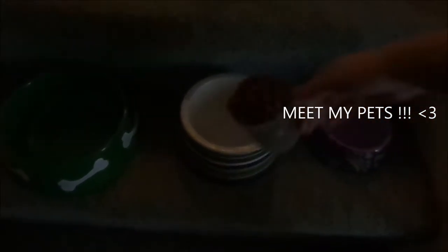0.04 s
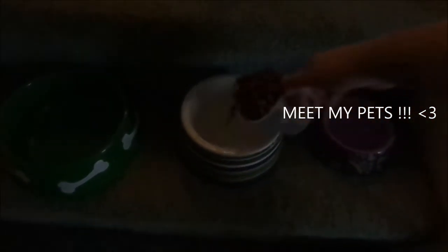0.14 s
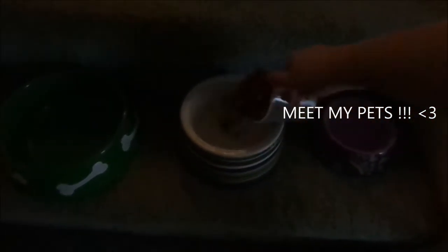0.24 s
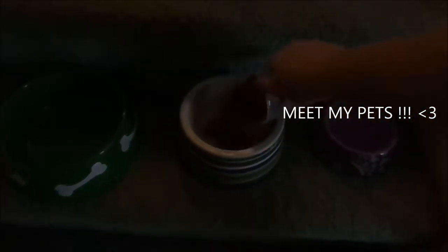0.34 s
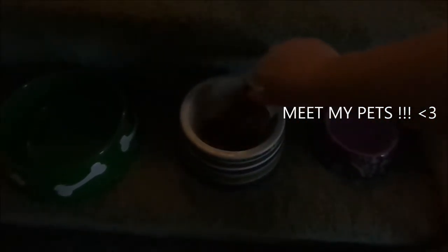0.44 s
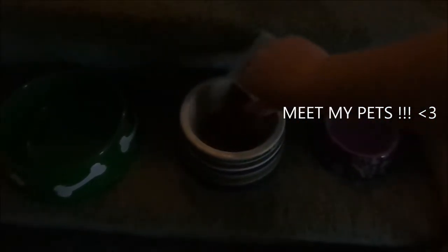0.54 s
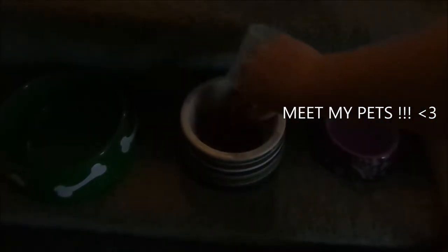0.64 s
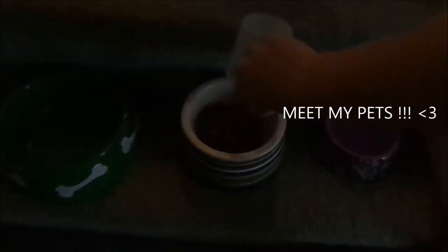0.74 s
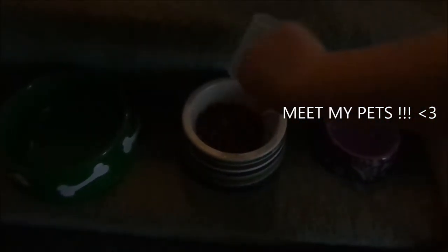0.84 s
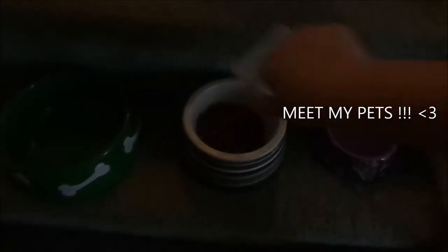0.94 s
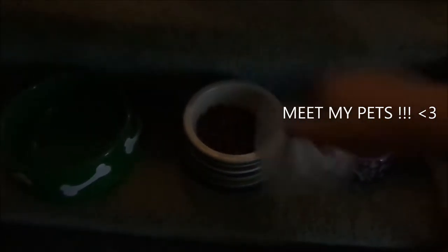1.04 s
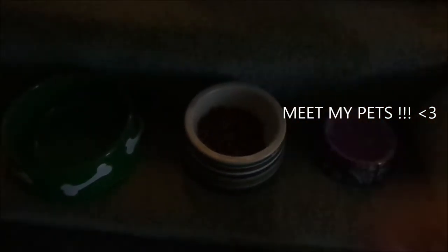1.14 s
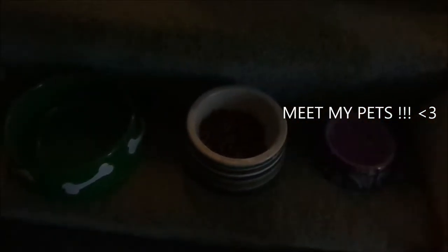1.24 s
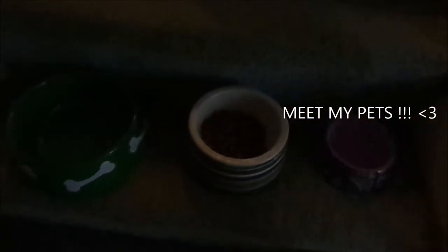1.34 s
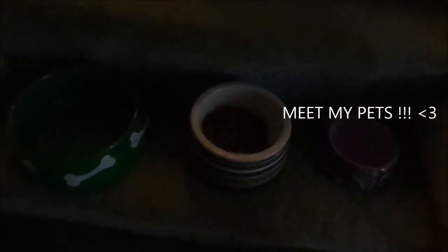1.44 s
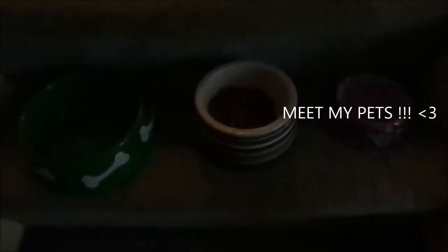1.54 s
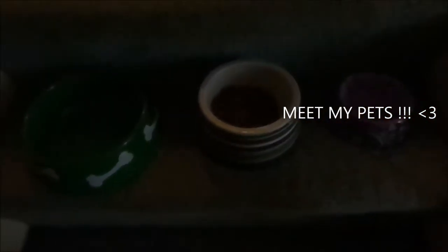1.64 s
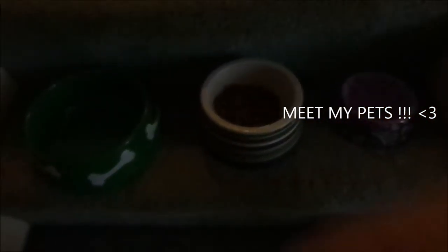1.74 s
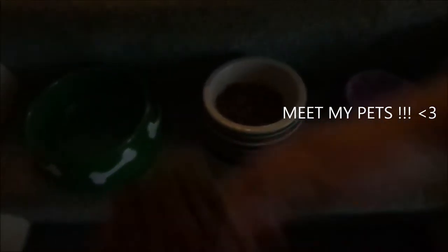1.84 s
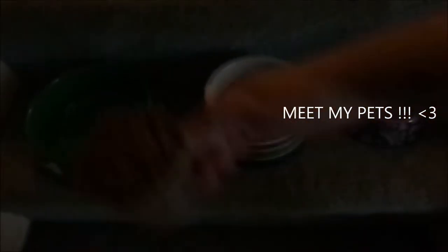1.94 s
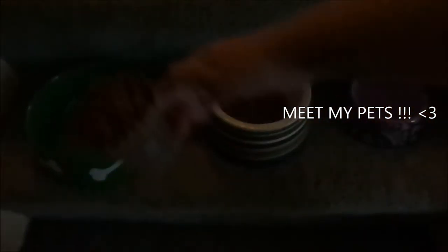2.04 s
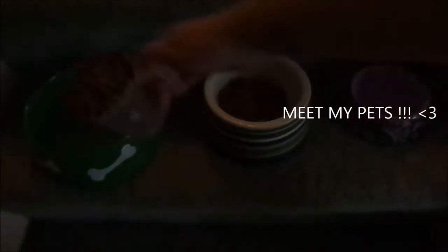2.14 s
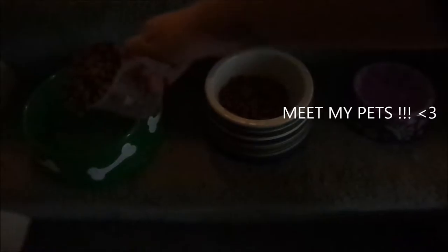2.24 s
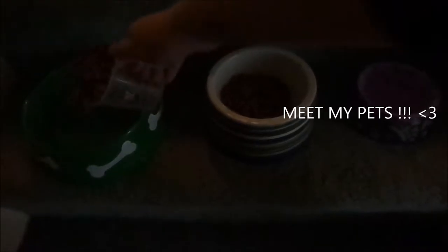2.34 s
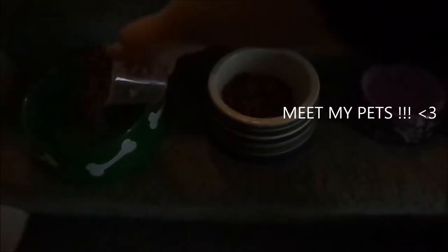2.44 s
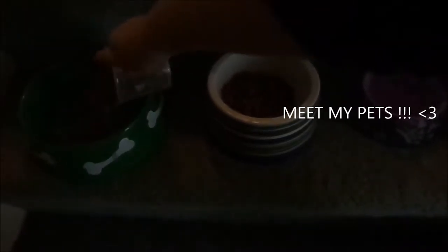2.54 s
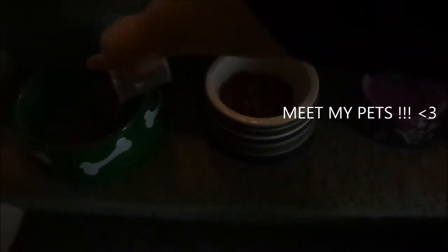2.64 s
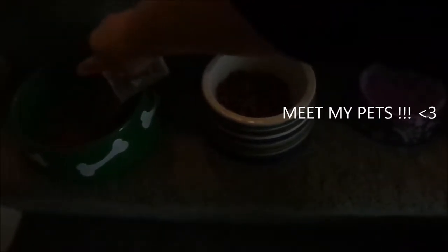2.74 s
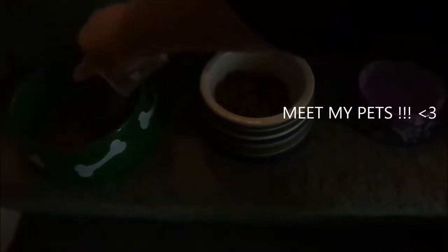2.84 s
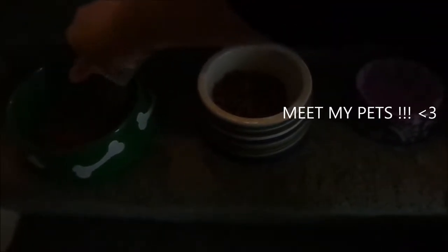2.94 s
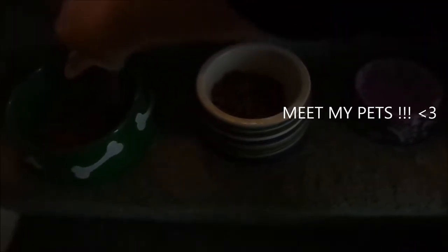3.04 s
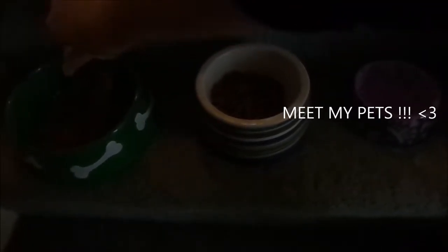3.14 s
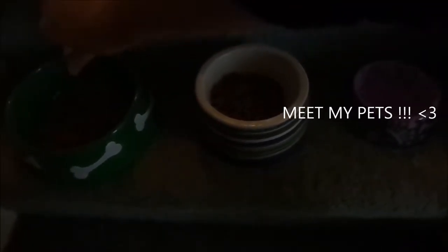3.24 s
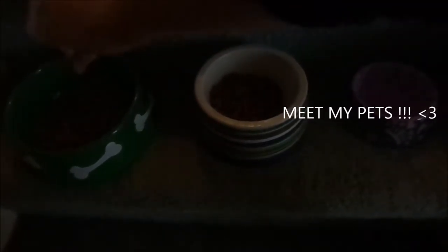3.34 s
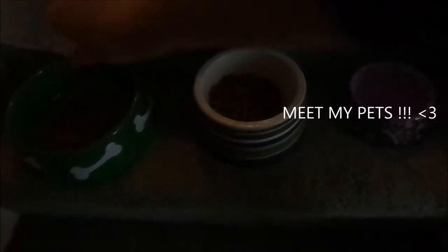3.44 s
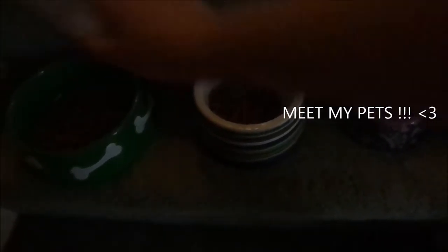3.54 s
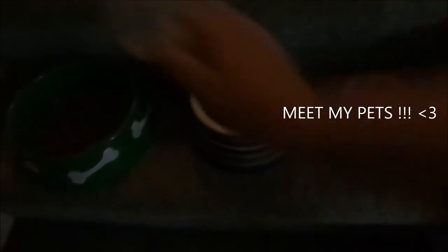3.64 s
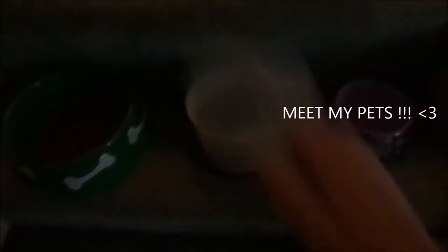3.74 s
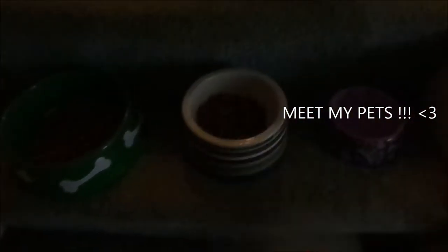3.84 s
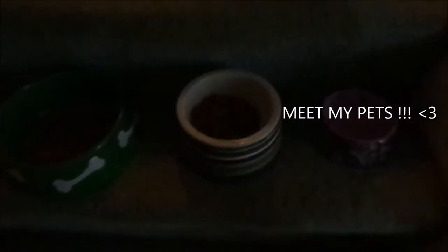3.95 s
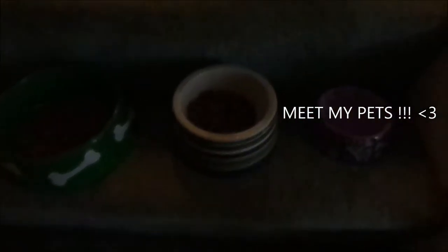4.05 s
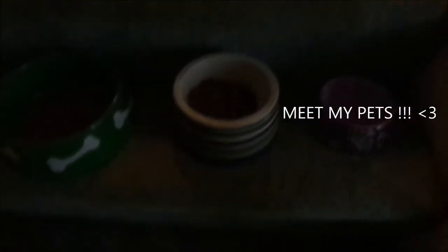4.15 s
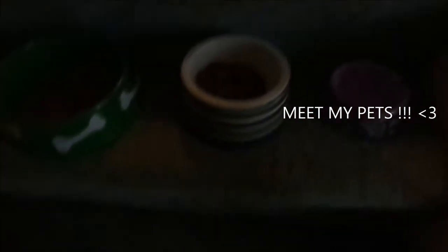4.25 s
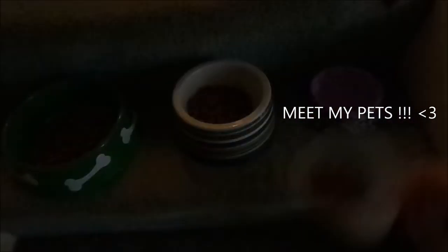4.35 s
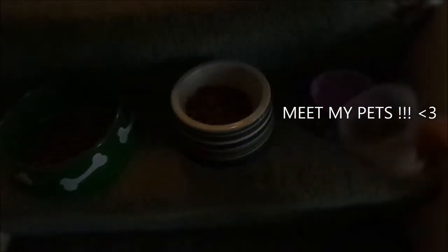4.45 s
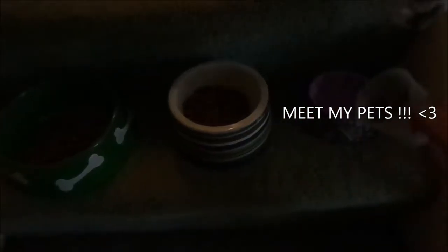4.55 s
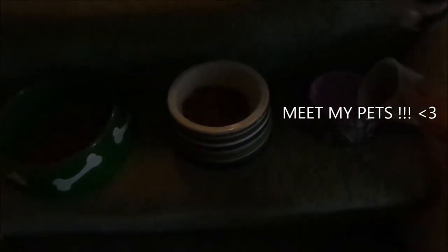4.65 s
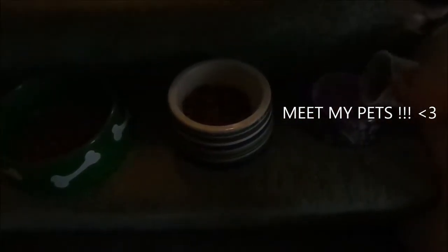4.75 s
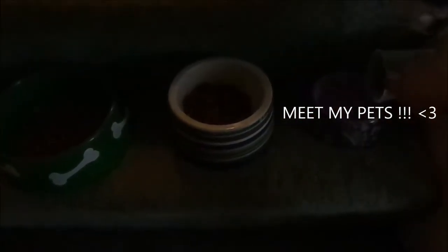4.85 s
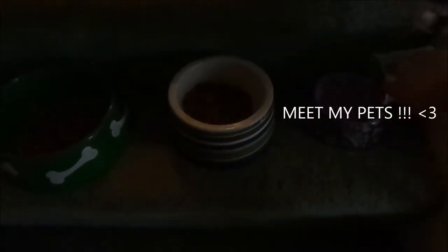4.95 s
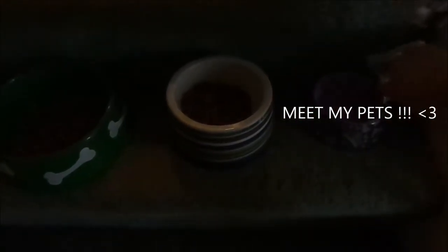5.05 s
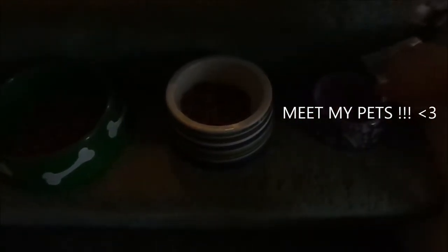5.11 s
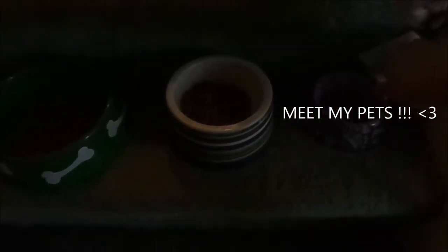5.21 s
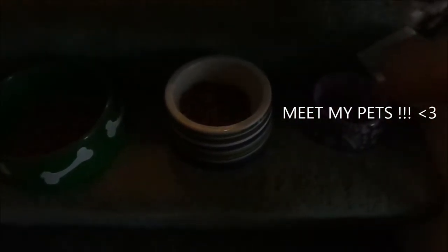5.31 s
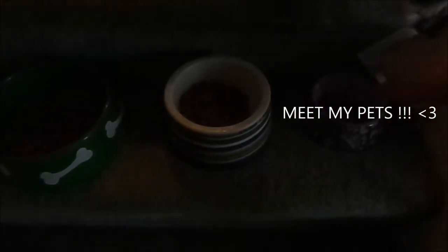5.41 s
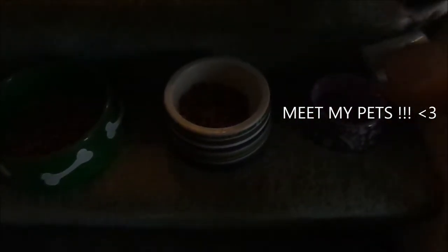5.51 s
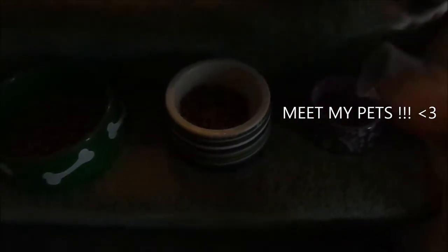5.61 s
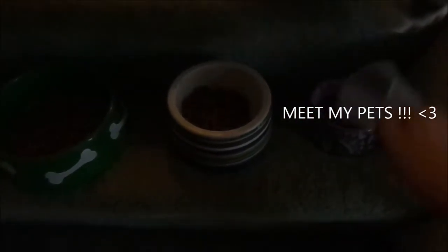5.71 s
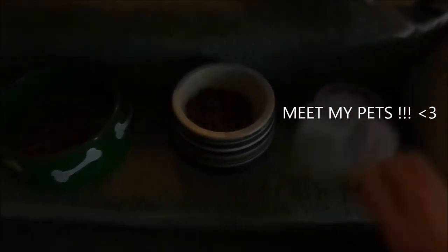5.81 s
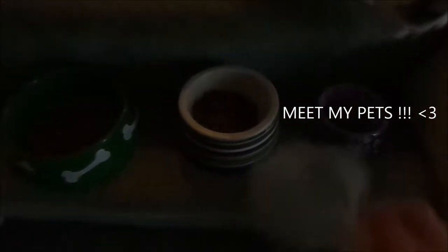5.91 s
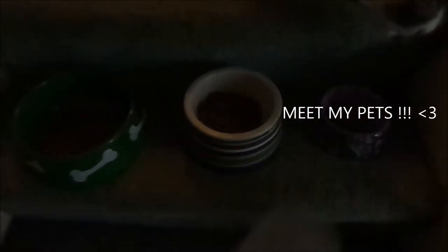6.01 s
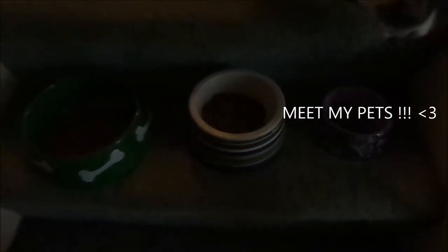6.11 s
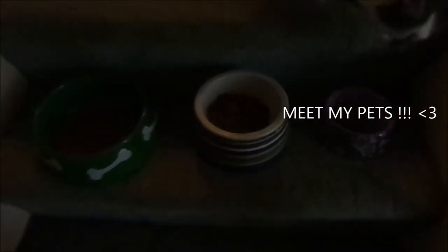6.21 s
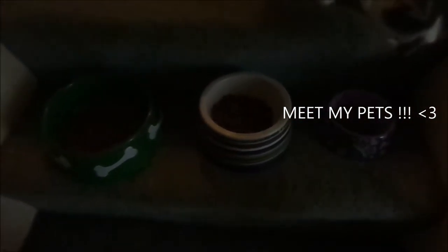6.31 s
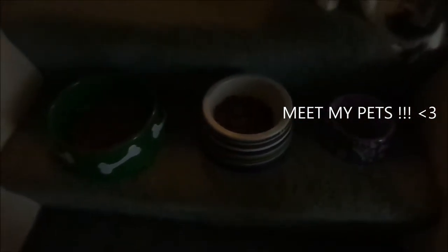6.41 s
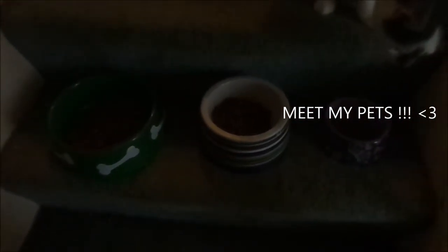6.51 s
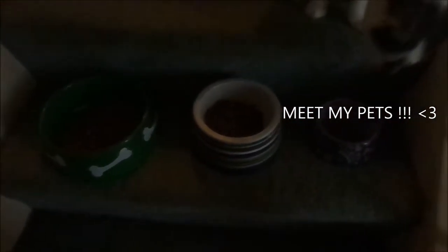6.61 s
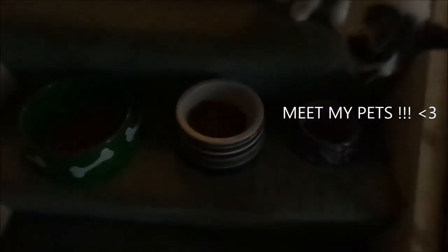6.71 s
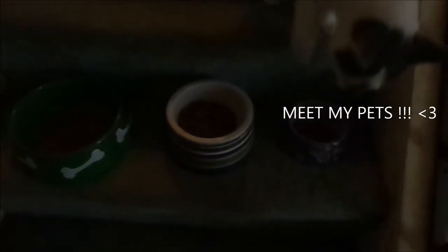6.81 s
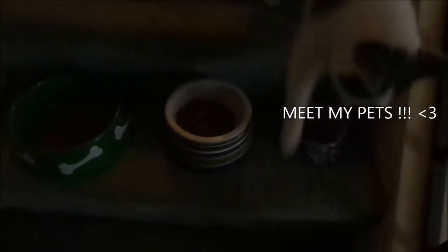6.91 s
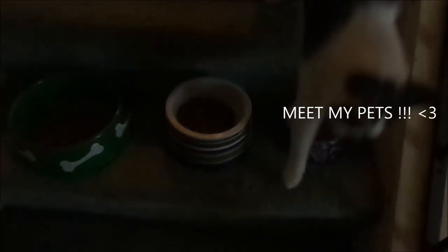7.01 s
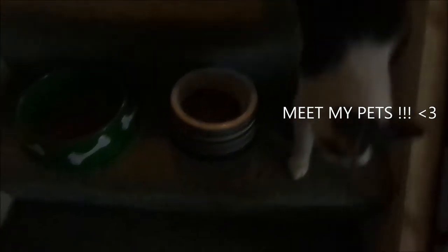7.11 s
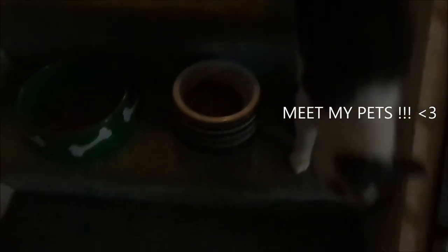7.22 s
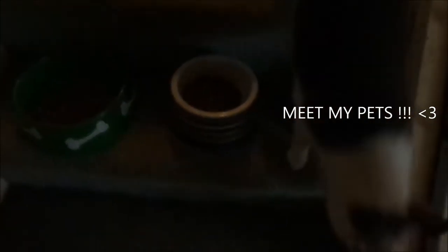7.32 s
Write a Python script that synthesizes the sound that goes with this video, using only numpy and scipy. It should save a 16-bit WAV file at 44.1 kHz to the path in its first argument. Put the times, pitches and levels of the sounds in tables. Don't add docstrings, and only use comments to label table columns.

```python
import sys
import numpy as np
from scipy import signal
from scipy.fft import rfft, irfft
from scipy.io import wavfile
from scipy.ndimage import uniform_filter1d

SR = 44100
rng = np.random.default_rng(int(sys.argv[2]) if len(sys.argv) > 2 else 0)


def master_out(mix):
    frames = np.transpose(np.atleast_2d(mix))
    ceiling = np.clip(frames, -1, 1)
    pcm = np.round(ceiling * 32767).astype(np.int16)
    wavfile.write(sys.argv[1], SR, pcm)


def decibels_to_gain(level_db):
    exponent = np.asarray(level_db, float) / 20
    return 10 ** exponent


N = 325017
t = np.arange(N) / SR


def unit(x):
    return x / np.sqrt(np.mean(x ** 2))


def noise():
    return rng.standard_normal(N)


def wander(*sizes):
    drift = noise()
    for size in sizes:
        drift = uniform_filter1d(drift, size=size)
    return unit(drift)


def filtered(x, order, hz, kind):
    return signal.sosfilt(signal.butter(order, hz, kind, fs=SR, output="sos"), x)


def through(x, taps):
    return signal.oaconvolve(x, taps / np.linalg.norm(taps))[:N]


def colour(x, points):
    hz, db = np.transpose(points)
    grid = np.linspace(1, SR / 2, 1025)
    level_db = np.interp(np.log(grid), np.log(hz), db)
    cepstrum = irfft(np.log(decibels_to_gain(level_db)))
    cepstrum[1:1024] *= 2
    cepstrum[1025:] = 0
    return through(x, irfft(np.exp(rfft(cepstrum))))


def ring(x, modes):
    taps, lag = 0, np.arange(SR // 4) / SR
    for hz, width, db in modes:
        decay = width * np.exp(-np.pi * width * lag)
        taps = taps + decibels_to_gain(db) * decay * np.sin(2 * np.pi * hz * lag)
    return through(x, taps)


def bursts(times, gains, ms):
    kick = np.zeros(N)
    at = np.minimum((np.asarray(times) * SR).astype(int), N - 1)
    np.add.at(kick, at, gains)
    return signal.lfilter([1], [1, -np.exp(-1000 / ms / SR)], kick)


def swell(s, db, rise_ms, t60):
    age = np.maximum(t - s, 0)
    rise = 1 - np.exp(-1000 * age / max(rise_ms, .2))
    return rise * decibels_to_gain(db - 60 * age / max(t60, .02))


def tent(peak_s, db, rise_db_s, fall_db_s):
    return decibels_to_gain(db - np.maximum(rise_db_s * (peak_s - t), fall_db_s * (t - peak_s)))


def room(x, t60):
    lag = np.arange(SR // 2) / SR
    hiss = rng.standard_normal(len(lag))
    dull = uniform_filter1d(hiss, size=6)
    tail = dull * decibels_to_gain(-60 * lag / t60) + (hiss - dull) * decibels_to_gain(-60 * lag / (0.66 * t60))
    tail *= np.clip(lag / 0.0028, 0, 1)
    return through(x, tail)


# start_s, level_db
FLOWS = [
    [(0.335, -38), (0.345, -20), (0.40, -19), (0.465, -9.5), (0.481, -17.5), (0.68, -34)],
    [(0.6, -32.5), (0.7, -32.5), (0.715, -29), (0.82, -30), (0.966, -45.5), (1.12, -66)],
    [(2.455, -48), (2.47, -26), (2.585, -16.5), (2.64, -21), (2.72, -16.5), (3.04, -27), (3.33, -35),
     (3.56, -80)],
    [(5.075, -42), (5.09, -23), (5.14, -18.5), (5.24, -19), (5.295, -26), (5.32, -37), (5.4, -58)],
]
# start_s, peak_db
MIDDLE_PELLETS = [(0.3053, -0.5), (0.3261, -6), (0.3416, -1.5), (0.3426, -3.5), (0.358, -13), (0.372, 0.5),
                  (0.399, -13), (0.418, -0.5), (0.4334, -7), (0.4477, -6), (0.4575, -4), (0.4635, -12.5),
                  (0.489, -11.5), (0.5078, -10.5), (0.5211, -5), (0.572, -13), (0.5787, -28)]
CUP_PELLETS = [(0.619, -38), (0.63, -41), (0.638, -22), (0.657, -30), (0.6658, -38.5), (0.713, -10),
               (0.7216, -23), (0.7365, -6.5), (0.7615, -5), (0.7924, -26), (0.8154, -9.5), (0.829, -13),
               (0.8467, -8), (0.8856, -22)]
WIDE_PELLETS = [(2.413, 0.5), (2.442, -1.5), (2.462, 1.5), (2.474, -0.5), (2.498, 0), (2.51, -4),
                (2.522, 0), (2.54, -1.5), (2.558, 5), (2.566, -2), (2.591, -0.5), (2.608, -1), (2.706, 3),
                (2.78, -16), (2.794, -7), (2.804, -24), (2.858, -7.5), (2.876, -6.5), (2.894, -28),
                (2.942, -32), (2.959, -22), (2.983, -12), (3.248, -26), (3.261, -26), (3.378, -22.5),
                (3.393, -23), (3.404, -21.5), (3.489, -33.5)]
DISH_PELLETS = [(4.9594, -34), (5.0116, -2.5), (5.0462, -9.5), (5.0553, -9), (5.0848, -5), (5.0959, -7.5),
                (5.109, -14.5), (5.1176, -13), (5.137, -7), (5.1576, -4), (5.2391, -9.5), (5.2659, -19),
                (5.3133, -13), (5.339, -12), (5.397, -47)]
# pitch_hz, level_db (per Hz)
MIDDLE_CRACK = [(300, -45), (1000, -28), (2000, -24), (3300, -13), (4500, -4), (6000, -2), (9000, -5),
                (14500, -12)]
CUP_PELLET_CRACK = [(300, -14.5), (700, -7), (1900, -4), (3300, -3.5), (7000, -2), (10000, -3),
                    (14500, -10.5)]
WIDE_CRACK = [(150, -20.5), (400, -9.5), (1000, -6), (1600, -3.5), (3500, -6), (6000, -14.5), (14500, -21)]
DISH_CRACK = [(300, -45), (900, -25), (1700, -23), (2900, -10), (4500, -4), (6000, -5), (9000, -9),
              (14500, -16)]
# pitch_hz, width_hz, level_db
MIDDLE_MODES = [(1265, 40, -7), (1330, 60, -11), (2460, 50, -1), (2540, 70, -8), (3750, 80, 3),
                (3930, 80, 4), (4080, 90, 1), (4230, 70, -7), (5990, 150, -8), (6450, 120, -9),
                (7230, 130, -11), (8070, 100, -13), (9020, 140, -12)]
CUP_PELLET_MODES = [(3300, 240, -6), (5260, 250, -9.5), (6200, 280, -10), (7100, 680, -1.5),
                    (7900, 240, -3.5), (12300, 270, -9.5)]
WIDE_MODES = [(524, 24, -2), (794, 51, -0.5), (1590, 88, 0.5), (1760, 92, -5), (2240, 140, -4.5),
              (3020, 340, -18)]
DISH_MODES = [(1020, 70, -10), (1310, 120, -8), (2230, 100, 3), (2450, 80, -1), (3390, 120, 0),
              (3560, 110, -3), (4140, 100, -6), (4780, 110, -7), (5280, 150, -5), (6610, 120, -9),
              (7430, 130, -11), (9010, 150, -9), (11300, 160, -14), (13400, 160, -17)]
# pellets_per_s, size_scatter_db, stream_db, modes_db, crack_ms,
# lowest_hz (that the wall radiates), heap_damping_db_s
POUR_SETTINGS = [
    (1100, 4, -5, 1, 1.2, 1050, 22),
    (1600, 3.5, -2, -4, 1.1, 2000, 5),
    (2300, 3.2, -3, -3, 1.5, 380, 3),
    (2200, 2.4, -4, 2, 1.2, 960, 8),
]


def pours():
    pellets = MIDDLE_PELLETS, CUP_PELLETS, WIDE_PELLETS, DISH_PELLETS
    cracks = MIDDLE_CRACK, CUP_PELLET_CRACK, WIDE_CRACK, DISH_CRACK
    modes = MIDDLE_MODES, CUP_PELLET_MODES, WIDE_MODES, DISH_MODES
    return sum(pour(*one) for one in zip(FLOWS, pellets, cracks, modes, POUR_SETTINGS))


def pour(flow, pellets, crack, modes, settings):
    rate, scatter_db, stream_db, modes_db, crack_ms, low_hz, heap_db_s = settings
    flow_s, flow_db = np.transpose(flow)
    gate = np.clip(np.minimum(t - flow_s[0], flow_s[-1] - t) / 0.0054, 0, 1)
    stream = gate * decibels_to_gain(np.interp(t, flow_s, flow_db) + stream_db)

    chance, grit = rng.random((2, N)), noise()
    falls = np.flatnonzero(chance[0] < rate / SR)
    sizes = decibels_to_gain(-scatter_db * np.log(1 - chance[1, falls]))
    hail = unit(grit * bursts(falls / SR, sizes, crack_ms))
    s, peak_db = np.transpose(pellets)
    crumbs = bursts(s, decibels_to_gain(peak_db - 19.5), 3.48)
    hail = hail * (stream + crumbs)

    rattle = (0.36 * np.sign(grit) + 0.17 * grit) * bursts(s, decibels_to_gain(peak_db - 10.5), crack_ms)
    push = bursts(s, decibels_to_gain(peak_db + 7), .01)
    wall = filtered(ring(hail + .5 * rattle + push, modes), 4, low_hz, "high")
    wall_gain = decibels_to_gain(modes_db - heap_db_s * np.maximum(t - flow_s[0], 0))
    return colour(hail + rattle, crack) + wall_gain * wall


# (pitch_hz, width_hz, level_db)
CUP_TAP = (2.311, -36, [(2520, 500, 0), (3200, 600, -1)])


def rim():
    s, peak_db = np.transpose(MIDDLE_PELLETS)
    choke_db = 70.5 * (s - s[0])
    hits = bursts(s, decibels_to_gain(np.minimum(peak_db, -3) + 12 - choke_db), .01)
    tone = ring(hits, [(2510, 22, 0)])
    tap_s, tap_db, modes = CUP_TAP
    return tone + ring(noise() * bursts([tap_s], decibels_to_gain(tap_db), 2.3), modes)


# start_s, knock_db, hardness_db (crack over knock)
LANDINGS = [
    (6.3982, -7, 0),
    (6.416, -20, -2.5),
    (6.444, -24, -9),
    (6.506, -28, -17),
    (6.521, -27.5, -8),
    (6.535, -34, -18),
    (6.688, -38, -6),
    (6.757, -26, -5.5),
    (6.884, -30.5, -28),
]
# pitch_hz, width_hz, level_db
CUP_MODES = [(2080, 84, -26), (2436, 88, -2.5), (2920, 130, -3), (3095, 150, 5), (4350, 200, 0.5),
             (5055, 150, -16)]
# pitch_hz, level_db (per Hz)
LANDING_CRACK = [(200, -33), (500, -14), (1400, -11.5), (3000, 11.5), (4500, 12.5), (8000, 0.5),
                 (14500, -6)]


def dropped_cup():
    s, knock_db, hard_db = np.transpose(LANDINGS)
    crack_db = knock_db + hard_db
    thud_db = -21.5 + 1.66 * (knock_db - knock_db[0])
    blow = noise() * bursts(s, decibels_to_gain(crack_db - 6.0), 9.7)
    knock = ring(noise() * bursts(s, decibels_to_gain(knock_db - 1.5), 1.2), [(920, 53, 1), (1025, 57, 0)])
    thud = ring(noise() * bursts(s, decibels_to_gain(thud_db + 2.5), 2.9), [(186, 16, 2.0), (349, 23, 0.66)])
    return colour(blow, LANDING_CRACK) + decibels_to_gain(1) * ring(blow, CUP_MODES) + knock + thud


# start_s, peak_db, t60_s
PAW_SCUFFS = [(0.06, -31.5, 1), (1.1385, -34.5, 1), (1.2644, -31.5, 0.17), (1.348, -39.5, 1),
              (1.4994, -45.5, 0.68), (3.49, -41.5, 0.9), (3.5813, -43.5, 0.21), (3.707, -33.5, 0.29),
              (4.4287, -35.5, 0.33), (4.4856, -28.5, 0.38), (4.8509, -44, 0.41), (4.956, -27.5, 0.47),
              (5.4194, -32.5, 0.83), (6.0653, -28.5, 0.4), (6.2499, -32, 0.5), (6.679, -27, 0.38),
              (6.815, -35.5, 1), (6.9494, -46.5, 1), (7.3405, -34, 0.63)]
# start_s, peak_db, t60_s
CUP_SLIDES = [(0.0004, -21.5, 0.32), (.275, -35, 0.51), (1.205, -32, 0.39), (1.4466, -28.5, 0.24),
              (4.5111, -41.5, 0.26), (4.755, -47.5, 0.65), (5.5495, -28.5, 0.63), (5.6574, -32, 0.21),
              (6.2759, -37, 0.19), (6.73, -37.5, 0.39), (7.1783, -24.5, 0.37)]
# pitch_hz, level_db (per Hz)
SCUFF_COLOUR = [(500, -28.5), (900, -7.5), (1500, -6), (3400, -0.5), (6000, -2.5), (10000, -2), (14500, -4)]


def scuffs():
    rows = [(*row, 5.9, -15) for row in PAW_SCUFFS]
    rows += [(*row, 9.4, -6) for row in CUP_SLIDES]
    rasp = sum(swell(s, db - 14, rise_ms, .85 * t60) for s, db, t60, rise_ms, _ in rows)
    hump = sum(swell(s, db - 5.0 + hump_db, rise_ms, 1.19 * t60) for s, db, t60, rise_ms, hump_db in rows)
    start_s, peak_db = np.array(rows)[:, :2].T
    ticks = bursts(start_s, decibels_to_gain(peak_db - 16.5), 2.8)
    grain = decibels_to_gain(2 * wander(90) + 1.2 * wander(600))
    hollow = ring(hump * grain * noise(), [(2780, 800, -13.0), (3800, 1400, 7.5)])
    return colour((rasp * grain + ticks) * noise(), SCUFF_COLOUR) + hollow


# start_s, peak_db, t60_s
TAG_SHAKES = [
    (0.1316, -39, 0.31),
    (0.2149, -50.5, 0.35),
    (0.8155, -19, 0.22),
    (0.9048, -32, 0.25),
    (1.266, -42, 0.4),
    (7.3432, -20.5, 0.54),
]
# pitch_hz, width_hz, level_db
TAG_MODES = [(12930, 45, 0), (7840, 40, -19), (11390, 40, -14)]


def tag():
    knocks_per_s = 700
    hits = rng.random(N) < knocks_per_s / SR
    knocks = noise() * hits * np.sqrt(SR / knocks_per_s)
    swing = sum(swell(s, db - 6.5, 8, t60) for s, db, t60 in TAG_SHAKES)
    return ring(knocks * swing, TAG_MODES)


# start_s, length_s, first_pitch_hz, held_pitch_hz, level_db
CAT_MEWS = [
    (1.62, .44, 858, 852, -61),
    (3.66, .64, 680, 782, -61),
]
# pitch_hz, level_db
CAT_MOUTHS = [
    [(800, 1), (1700, 4), (2600, -2), (3500, -3), (4300, -10), (5200, -21), (7000, -22)],
    [(700, -6), (1600, 2), (2350, 3), (2700, -4), (3200, -4), (4000, -9), (6500, -20)],
]


def mews():
    attack_s, release_s, glide_s, drift_hz_s = .04, .07, .21, 45
    open_s, close_db_s = .25, 11
    out = 0
    for (s, length, first_hz, held_hz, level_db), mouth in zip(CAT_MEWS, CAT_MOUTHS):
        age = np.clip(t - s, 0, length)
        gate = np.minimum(age / attack_s, 1) * np.minimum((length - age) / release_s, 1)
        glide = np.minimum(age / glide_s, 1) ** 1.4
        hz = first_hz + (held_hz - first_hz) * glide + drift_hz_s * age
        hz = hz * (1 + 0.0045 * wander(700))
        phase = 2 * np.pi * np.cumsum(hz) / SR
        for k in range(1, 9):
            flutter_db = 3 * wander(900, 500)
            closing_db = close_db_s * k * np.maximum(age - open_s, 0)
            mouth_db = np.interp(k * hz, *np.transpose(mouth))
            overtone = np.sin(k * phase + k * k)
            out = out + gate * decibels_to_gain(level_db - closing_db + flutter_db + mouth_db) * overtone
    return out + decibels_to_gain(-3) * room(out, .35)


# pitch_hz, width_hz, level_db
DOG_THROAT = [(397, 220, -4.5), (520, 160, -2.5), (723, 83, 4.5), (980, 47, -9)]


def woof():
    high_hz, broken_hz, break_s, break_width_s = 416, 355.5, 5.565, 0.0033
    unbroken = (1 - np.tanh((t - break_s) / break_width_s)) / 2
    hz = broken_hz + (high_hz - broken_hz) * unbroken
    effort = uniform_filter1d(tent(5.56, -18, 270, 160), int(.04 * SR))
    shaky = 1 + .025 * wander(300)
    turns = np.cumsum(hz * shaky) / SR
    pulses = np.exp(-(turns % 1) / 0.11)
    source = 0.082 * unit(pulses - pulses.mean()) + noise()
    muffled = filtered(ring(source, DOG_THROAT), 5, [310, 1230], "band")
    tone = np.sqrt(2) * np.sin(2 * np.pi * np.cumsum(hz) / SR)
    return effort * unit(muffled + room(muffled, 0.042)) + tent(5.53, -16, 894, 247) * tone


# pitch_hz, level_db (per Hz)
HOUSE_COLOUR = [(25, -29), (70, -26), (150, -24.5), (235, -10), (450, -6), (880, -4), (6000, -28),
                (14800, -35)]


def house():
    return decibels_to_gain(-52 + .7 * wander(6000, 6000)) * colour(noise(), HOUSE_COLOUR)


# pitch_hz, level_db
STEREO_WIDTH = [(100, -2), (400, -14.5), (2000, -9.5), (5000, -2.5), (15000, 7)]


def scene():
    near = pours() + dropped_cup() + rim()
    mid = near + decibels_to_gain(-9) * room(near, 0.42) + scuffs() + tag() + mews() + woof()
    mid = filtered(mid, 2, 190, "high") + house()
    apart = wander(5000) > 0
    side = decibels_to_gain(-13.5) * apart * colour(room(mid, .02), STEREO_WIDTH)
    return np.array([mid + side, mid - side])


def roll_off(x):
    return signal.sosfilt(signal.butter(12, 15960, fs=SR, output="sos"), x)


# start_s, end_s
SCENE_CHANGE = (1.593, 1.626)
# start_s, end_s, above_hz
TREBLE_DROPOUT = (3.142, 3.198, 5400)


def record(dry):
    ceiling = .5
    loud = dry / (1 + np.abs(dry / ceiling) ** 6) ** (1 / 6)
    before_s, after_s = SCENE_CHANGE
    heard = np.clip(np.maximum(before_s - t, t - after_s) / 0.002, 0, 1)
    top_cut = signal.ellip(8, .2, 50, 14950, fs=SR, output="sos")
    dull = signal.sosfilt(top_cut, loud * heard)
    start, end, gap_hz = TREBLE_DROPOUT
    treble = signal.sosfiltfilt(signal.butter(10, gap_hz, "high", fs=SR, output="sos"), dull)
    gap = np.clip(np.minimum(t - start, end - t) / .004, 0, 1)
    return roll_off(dull - gap * treble)


dry = scene()
out = record(dry)
master_out(out)
```